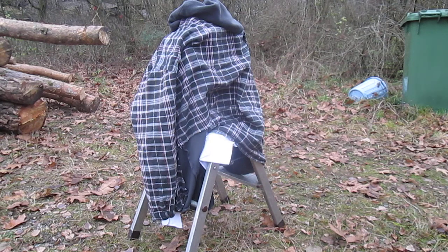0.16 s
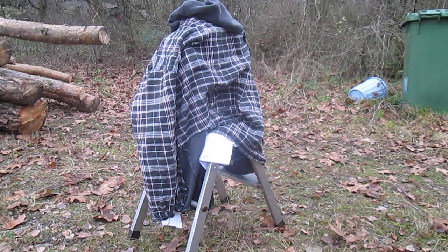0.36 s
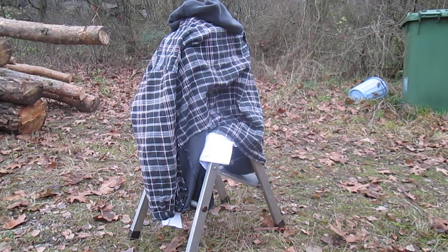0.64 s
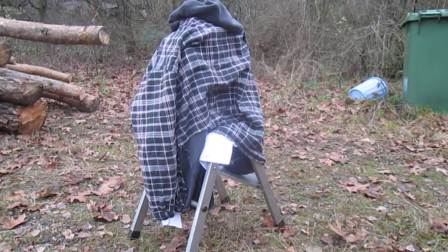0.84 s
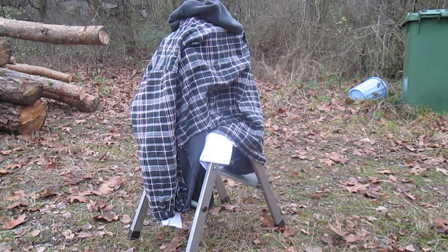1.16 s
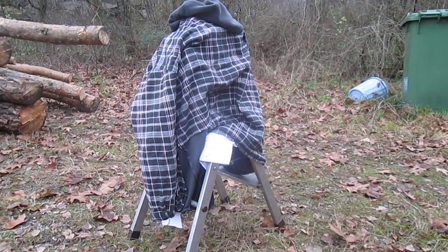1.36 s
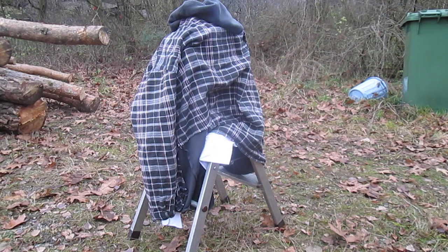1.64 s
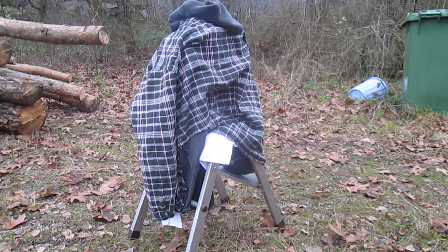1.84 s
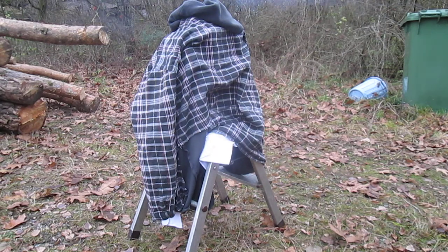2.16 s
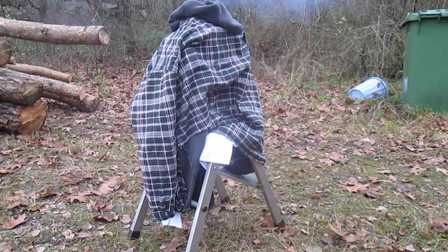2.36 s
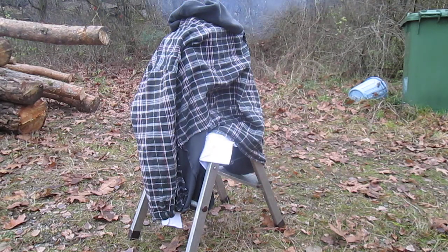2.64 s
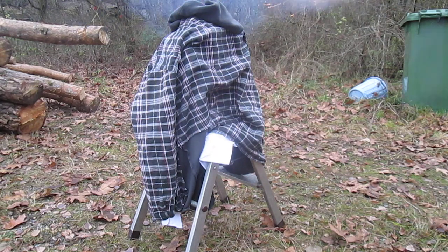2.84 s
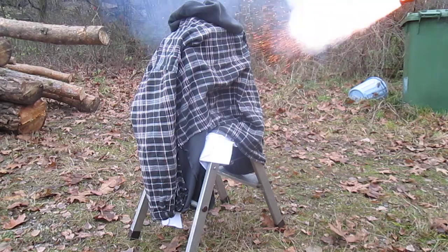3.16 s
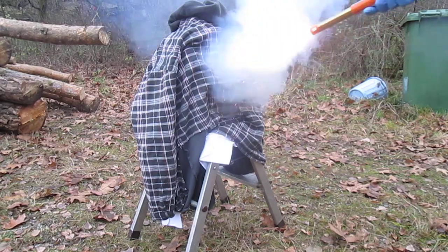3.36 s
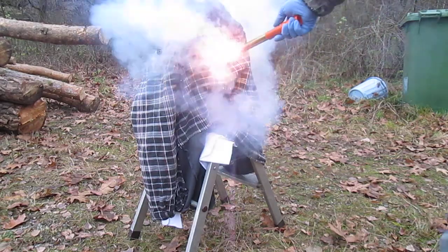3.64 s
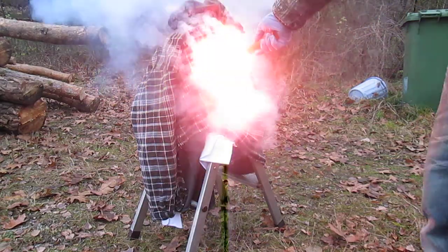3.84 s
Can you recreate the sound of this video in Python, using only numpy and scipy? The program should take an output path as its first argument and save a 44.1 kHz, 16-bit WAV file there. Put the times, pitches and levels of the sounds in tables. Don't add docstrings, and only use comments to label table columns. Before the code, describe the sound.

A hand flare clicks, scrapes, sputters unevenly, then bursts into a full hissing roar outdoors

```python
import sys
import numpy as np
from scipy import signal
from scipy.io import wavfile
from scipy.ndimage import uniform_filter1d, minimum_filter1d, map_coordinates

SR = 44100
rng = np.random.default_rng(int(sys.argv[2]) if len(sys.argv) > 2 else 0)


def dump_mix(stems):
    frames = np.atleast_2d(stems).T
    limited = np.clip(frames, -1, 1)
    pcm = np.round(limited * 32767).astype(np.int16)
    wavfile.write(sys.argv[1], SR, pcm)


def gain_from_db(level_db):
    decades = np.asarray(level_db, float) / 20
    return 10 ** decades


N = 176400


def rms_one(x):
    return x / np.sqrt(np.mean(x ** 2) + 1e-20)


def noise():
    return rng.standard_normal(N)


def in_time(rows):
    s, *columns = np.transpose(rows)
    return [np.interp(np.arange(N) / SR, s, c) for c in columns]


def cut(x, hz, kind, order=2):
    return signal.sosfilt(signal.butter(order, hz, kind, fs=SR, output="sos"), x)


def drift(rate):
    r = np.exp(-80 * np.pi * rate / SR)
    slow = signal.lfilter([1], [1, -2 * r, r * r], rng.standard_normal(N // 40 + 2002))[2000:]
    return np.interp(np.arange(N) / 40, np.arange(len(slow)), rms_one(slow))


def ring(clicks, hz, t60):
    r, w = gain_from_db(-60 / (t60 * SR)), 2 * np.pi * hz / SR
    return signal.lfilter([0, np.sin(w)], [1, -2 * r * np.cos(w), r * r], clicks + 1e-18)


def late(x, seconds):
    return map_coordinates(x, [np.arange(N) - seconds * SR + np.zeros(N)], order=3, mode="nearest")


def banded(spectrum, patchy_db, grain=0, unit_hz=1, focus=1, count=3):
    out, power = 0, 0
    edges = 22 * 2 ** np.arange(0, 9.6, 1 / count)
    white = rng.standard_normal((2, N)) + grain
    hzs, dbs = np.transpose(spectrum)
    for k, (low, high) in enumerate(zip(edges, edges[1:])):
        place = np.log(np.sqrt(low * high) / unit_hz)
        db = focus * np.interp(place, np.log(hzs), dbs, left=-90, right=-90)
        if np.max(db) > -70:
            power = power + gain_from_db(2 * db) * (high - low) / SR * 2
            band = cut(white[k % 2], [low, high], "band", order=3)
            out = out + gain_from_db(db + patchy_db * drift(7.7)) * band
    return out / np.sqrt(power)


# time_s, jet_level_db, roar_re_jet_db, jet_peak_hz
BURN = [(.53, -65.5, 0, 5040), (0.569, -51.5, -8, 4940), (.75, -34, -12.5, 4970), (.95, -35, -14.5, 5370),
        (1.199, -25.5, -18, 5350), (1.45, -26, -22.5, 5280), (1.85, -23.5, -22, 5190),
        (2.1, -27, -16.5, 5210), (2.55, -33, -16, 5170), (2.81, -25, -14, 5120), (2.86, -16.5, -8, 5220),
        (2.895, -12.5, -5.5, 4670), (2.941, -23.5, -4.5, 4470), (3.1, -22.5, -7, 4110),
        (3.4, -25, -4, 4470), (3.621, -24, -11.5, 4690), (3.72, -24.5, -27, 4675), (4.0, -25.5, -21, 4840)]
# time_s, level_db
STRIKE = [
    (.25, -62),
    (.268, -52),
    (.285, -29),
    (.287, -22),
    (.297, -30),
    (.311, -28.5),
    (.316, -39.5),
    (.414, -42.5),
    (.426, -61),
]
# multiple_of_peak, level_db_per_hz
JET = [(.12, -34), (.45, -14.5), (.72, -5), (1, 2.5), (1.25, -5), (1.55, -20), (2.2, -44.5), (3.2, -70)]
# pitch_hz, level_db_per_hz
ROAR = [(80, -44), (180, -19), (350, -4), (1000, 1.5), (2500, 1.5), (4000, 0.5), (6000, -16),
        (11000, -33.5)]
# time_s, focus_factor
FOCUS = [
    (0, 1.08),
    (2.8, 0.87),
    (3, 0.86),
    (3.4, 1.2),
    (3.7, 1.5),
    (4, 1.74),
]


def flare():
    sparks_per_s, spark_db, spark_spread_db = 250, -16, 1.5
    jet_db, roar_db, peak_hz = in_time([(0.36, -63.5, -7, 5250)] + BURN)
    strike_db, = in_time(STRIKE + [(.58, -104)])
    focus, = in_time(FOCUS)
    swing, thumps = chuffing()
    flicker = 1.0 * drift(16.3) + 0.79 * drift(29) + 1.0 * drift(270)
    level = gain_from_db(jet_db + swing + flicker)

    sizes = gain_from_db(spark_spread_db * np.minimum(rng.exponential(1, N), 4)) * rng.choice([-1, 1], N)
    sparks = gain_from_db(spark_db) * rms_one(sizes * (rng.random(N) < sparks_per_s / SR))
    jet = banded(JET, patchy_db=1.0, grain=sparks, unit_hz=peak_hz, focus=focus, count=5)
    roar = banded(ROAR, patchy_db=1.0, grain=4.86 * sparks)

    hiss = (level + gain_from_db(strike_db)) * jet
    body = (level * gain_from_db(roar_db + 0.24 * swing) + gain_from_db(strike_db - 11.5)) * roar
    return hiss + body + thumps + bright_edge(level, jet_db)


# end_s, build_up_s, rise_db, choke_db, thump_db
CHUFFS = [(.298, 0.016, 3, 7, -38), (.625, 0.1, 0.5, 6.5, -72), (0.688, 0.072, 5.5, 4, -73),
          (.955, 0.057, 4, -3.5, -57), (1.03, 0.032, 1, 0, -40.5), (1.156, 0.014, 3, 2.5, -62),
          (1.24, 0.039, 0, 7, -71), (1.67, 0.031, 1.5, 2, -59), (1.882, 0.013, -0.5, 5, -49),
          (2.013, 0.032, 5, 8, -48.5), (2.239, 0.1, 2.5, 0, -56), (2.326, 0.047, 5.5, 2, -43),
          (2.454, 0.035, 7, -1, -44), (2.625, 0.084, 3.5, -1.5, -79), (2.667, 0.0088, 0.5, 0, -62),
          (2.684, 0.017, 4.5, 1.5, -35), (2.799, 0.017, -0.5, 2.5, -39), (2.915, 0.091, 2.5, 2, -25),
          (3.752, 0.1, 2.5, -1, -61), (3.77, 0.0076, 2, 1.5, -75), (3.864, 0.12, 2, 1, -82),
          (1.905, 0.01, 3.5, 1, -44), (3.638, 0.078, 1, 0, -72)]


def chuffing():
    recover_s, thump_hz = 0.099, 246
    t, swing, puff = np.arange(N) / SR, np.zeros(N), np.zeros(N)
    for end, build, rise_db, choke_db, thump_db in CHUFFS:
        swell = np.clip(1 + (t - end) / build, 0, 1) * (t < end)
        recovery = np.exp(-(np.maximum(t - end, 0) / recover_s) ** 2)
        swing += rise_db * np.minimum(2 * swell, 1) - choke_db * (t >= end) * recovery
        puff += gain_from_db(thump_db) * swell ** 1.55
    low = rms_one(cut(cut(noise(), thump_hz, "low", order=1), 27, "high"))
    return uniform_filter1d(swing, size=180), uniform_filter1d(puff, size=100) * low


# time_s, level_re_jet_db
AIR = [
    (0, -50),
    (2.82, -63),
    (2.86, -0.5),
    (2.91, -4.5),
    (2.95, -31),
    (3.25, -21),
    (3.5, -11.5),
    (3.85, -12),
    (4, -12),
]


def bright_edge(level, jet_db):
    edge = cut(cut(noise(), 7200, "high"), 8450, "low", order=5)
    edge_level = level * gain_from_db(in_time(AIR)[0] + 2.2 * drift(14))
    glare_level = gain_from_db(jet_db - 30.5) * np.clip((jet_db + 24.0) / 3, 0, 1) ** 2
    return edge_level * edge + glare_level * cut(noise(), 9500, "high")


# crest_s, peak_db, pitch_hz
POPS = [(0.166, -28.5, 2500), (.2862, -31, 11000), (0.2868, -24, 1090), (0.312, -31.5, 700),
        (0.4117, -37, 1300), (0.7862, -21.5, 2140), (0.901, -28, 312), (.946, -16, 1780),
        (.9462, -11, 4930), (1.0232, -23, 560), (1.1472, -27, 590), (1.1982, -19.5, 2400),
        (1.2108, -18, 2200), (1.2108, -15, 4960), (1.2297, -12, 4930), (1.239, -26, 1800),
        (1.241, -10, 4730), (1.26, -31, 1110), (1.2757, -15, 4000), (1.2873, -20, 4500),
        (1.3224, -26, 1510), (1.3602, -32, 1800), (1.3934, -18, 1540), (1.5467, -22, 1800),
        (1.5513, -12, 5000), (1.5907, -22.5, 1090), (1.6622, -21.5, 1100), (1.6873, -37, 600),
        (1.8707, -25, 1800), (1.8756, -23, 1400), (1.9034, -27, 1230), (1.9033, -15, 4940),
        (2.0015, -20, 1810), (2.0065, -31, 600), (2.11, -28.5, 1100), (2.2243, -38, 550),
        (2.239, -23, 5000), (2.2858, -41, 550), (2.3074, -22, 530), (2.3288, -29, 495),
        (2.3764, -18.5, 4960), (2.4077, -34.5, 600), (2.4405, -22, 1790), (2.4487, -23.5, 520),
        (2.4912, -25, 1800), (2.578, -30, 915), (2.6205, -20, 2180), (2.679, -19.5, 1510),
        (2.6805, -22.5, 404), (2.7103, -26, 1500), (2.7236, -23, 1800), (2.7405, -14, 3500),
        (2.7557, -26, 1800), (2.7952, -27, 1100), (2.794, 2, 4830), (2.825, -15, 1800), (2.8434, -18, 550),
        (2.8643, -13, 550), (2.889, -5, 1000), (3.1706, -32, 1800)]


def pops():
    ring_cycles, tilt_db_per_octave = 3.7, 1
    out = np.zeros(N)
    for s, db, hz in POPS:
        one = np.zeros(1500)
        start = int((s - .8 / hz) * SR)
        one[0] = gain_from_db(db + tilt_db_per_octave * np.log2(hz / 1000))
        pop = cut(ring(one, hz, ring_cycles / hz), [0.4 * hz, 1.58 * hz], "band", order=3)
        out[start:start + len(one)] += 0.98 * pop
    return out


# time_s, peak_db
TICKS = [(.002, -32), (.022, -41), (.05, -46), (.062, -48), (0.071, -31.5), (.076, -25.5), (.088, -28),
         (0.096, -48), (.165, -37), (0.198, -27.5), (.231, -37), (.238, -31), (.26, -36), (.269, -31),
         (.2714, -23), (0.2734, -11), (0.2732, -13), (0.2783, -21), (0.279, -12), (0.2786, -12),
         (0.282, -22), (0.2874, -11), (0.287, -18), (.291, -12), (.299, -20), (.3038, -23), (.3063, -30),
         (0.3096, -11.5), (.313, -26)]


def cap_ticks():
    clicks = np.zeros(N)
    for s, db in TICKS:
        clicks[int(s * SR)] = gain_from_db(db)
    shell = 0.77 * ring(clicks, 4880, 0.0044) + 0.23 * ring(clicks, 4100, 0.0027) + 0.3 * ring(clicks, 6700, 0.0041)
    return 1.14 * cut(shell, [3300, 6800], "band", order=3) + .012 * cut(clicks, 7000, "high")


# time_s, level_db
FLUTTER = [
    (0, -100),
    (2.93, -100),
    (3.0, -54),
    (3.25, -45),
    (3.45, -50),
    (3.6, -45.5),
    (3.68, -51.5),
    (3.73, -72),
    (4, -82),
]


def flutter():
    level_db, = in_time(FLUTTER)
    low = cut(noise(), [121, 487], "band")
    return gain_from_db(level_db + 2.7 * drift(24)) * rms_one(low)


# time_s, delay_ms, strength_db
NEAR = [
    (0, 1.8, -53),
    (3.2, 1.33, -42.5),
    (3.5, 1.28, -15),
    (3.7, 1.17, -21),
    (3.8, 0.93, -9),
    (3.89, 0.8, -11.5),
    (4, 0.78, -7),
]


def figure_echo(sound):
    delay_ms, level_db = in_time(NEAR)
    return -gain_from_db(level_db) * late(cut(sound, 6500, "low"), delay_ms / 1000)


# time_s, delay_ms, strength_db
ECHO = [(0, 2.9, -14), (.7, 3.8, -14), (.9, 3.4, -14), (1.1, 2.9, -21), (1.3, 3.17, -9), (1.55, 2.96, -9.5),
        (2.1, 3, -6.5), (2.65, 2.85, -11), (3.1, 2.9, -13.5), (3.25, 2.66, -7.5), (3.5, 2.505, -5.5),
        (3.65, 2.26, -4), (3.75, 2.14, -6.5), (3.81, 2.1, -6.5), (4, 1.84, -10)]


def ground_echo(sound):
    delay_ms, level_db = in_time(ECHO)
    return gain_from_db(level_db) * late(cut(sound, 7400, "low", order=1), delay_ms / 1000)


def port_difference(direct, echo, diffuse):
    direct_lag_us, echo_lag_us, port_cut_hz = 18.8, 11, 2340
    slope = np.gradient(direct_lag_us * direct + echo_lag_us * echo) * SR * 5e-7
    return cut(cut(diffuse - slope, port_cut_hz, "high")[::-1], port_cut_hz, "high")[::-1]


# pitch_hz, level_db_per_hz
YARD = [(22, -3), (60, -2), (150, -8), (400, -11.5), (1000, -10), (1700, -16), (2400, -22), (9000, -39)]
# time_s, level_db
GAIN = [
    (0, -48.5),
    (.28, -47),
    (.31, -68),
    (.5, -58.5),
    (.8, -53.5),
    (1.4, -53),
    (1.7, -58.5),
    (2.6, -73),
    (4, -70),
]


def yard():
    gain_db, = in_time(GAIN)
    return gain_from_db(gain_db + 1.6 * drift(7.1)) * banded(YARD, patchy_db=0.8, count=2)


def scene():
    burning = flare()
    diffuse = gain_from_db(-22) * cut(np.roll(burning, 480) - np.roll(burning, 750), 7200, "high")
    sound = burning + cap_ticks() + pops() + flutter()
    sound = sound + figure_echo(sound)
    echo = ground_echo(sound)
    side = port_difference(sound, echo, diffuse)
    return gain_from_db(-0.5) * (sound + echo + side * [[1], [-1]]) + yard()


def low_pass(x):
    return signal.sosfilt(signal.butter(12, 15970, fs=SR, output="sos"), x)


def record(dry):
    ceiling, self_noise_db, alike = .41, -63, 0.14
    peak = uniform_filter1d(-minimum_filter1d(-np.abs(dry).max(axis=0), size=80), size=80)
    x = dry / (1 + (peak / ceiling) ** 8) ** .125
    hiss = rng.standard_normal((3, N))
    self_noise = np.sqrt(alike) * hiss[2] + np.sqrt(1 - alike) * hiss[:2]
    x = x + gain_from_db(self_noise_db) * cut(self_noise, 3600, "high")
    x = signal.sosfilt(signal.ellip(12, .5, 70, 15850, fs=SR, output="sos"), x)
    return low_pass(x - 0.012)


dry = scene()
out = record(dry)
dump_mix(out)
```